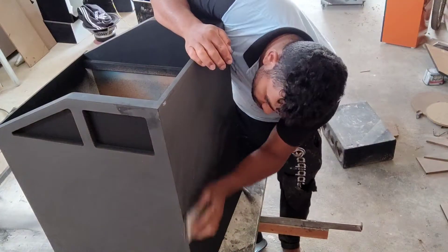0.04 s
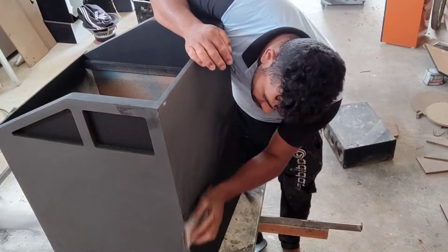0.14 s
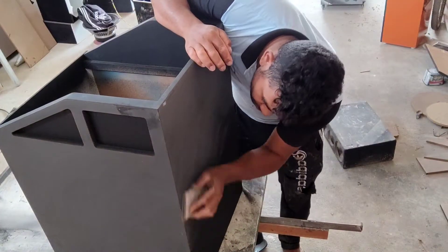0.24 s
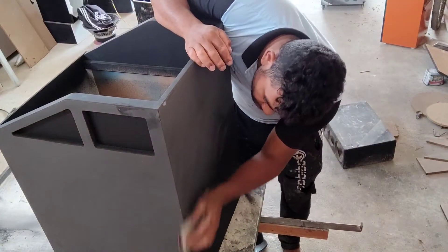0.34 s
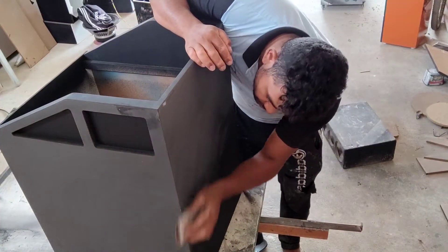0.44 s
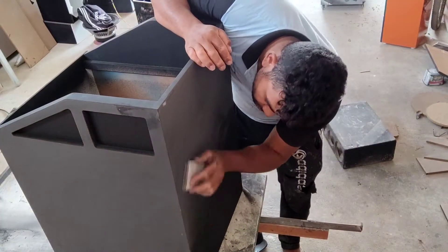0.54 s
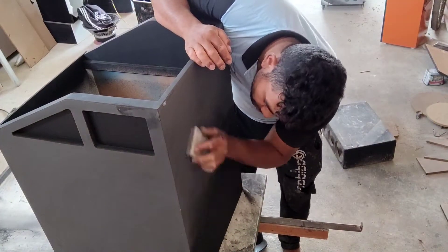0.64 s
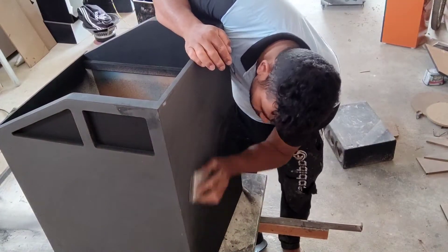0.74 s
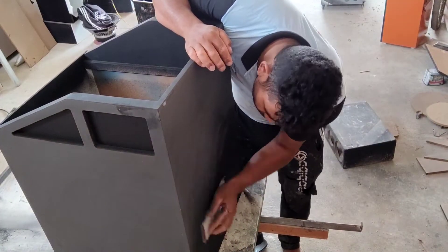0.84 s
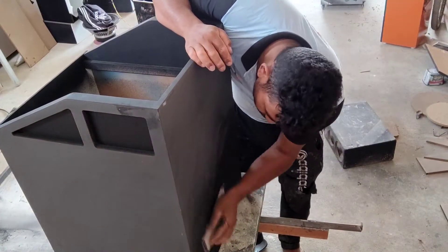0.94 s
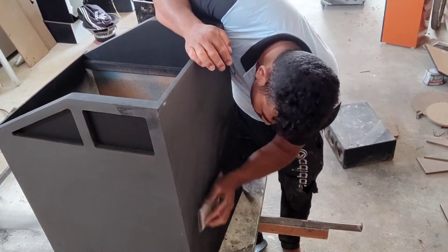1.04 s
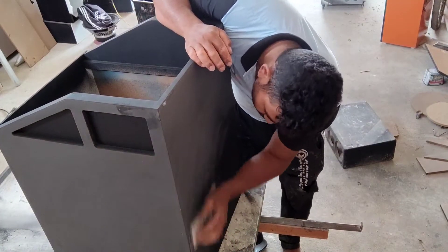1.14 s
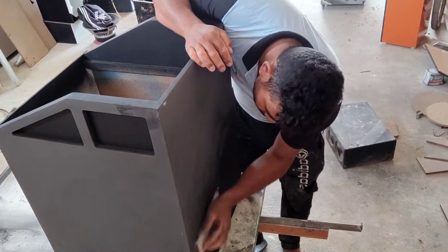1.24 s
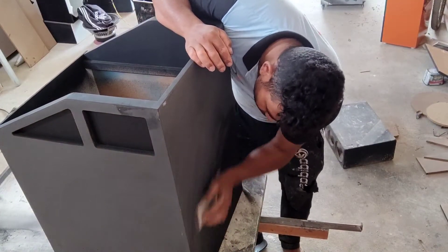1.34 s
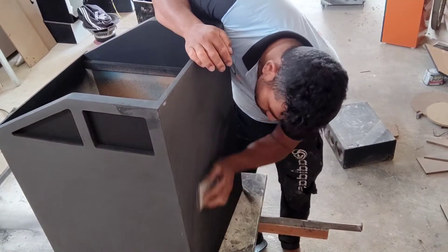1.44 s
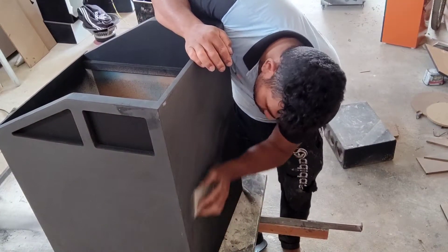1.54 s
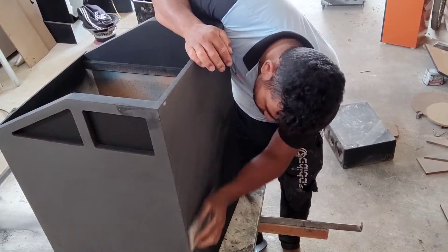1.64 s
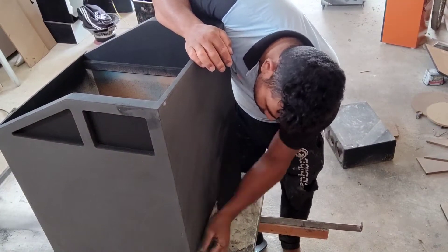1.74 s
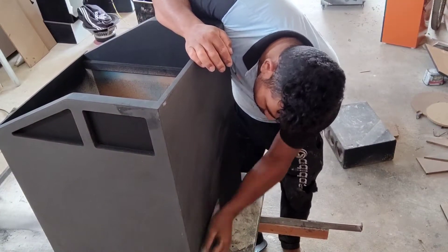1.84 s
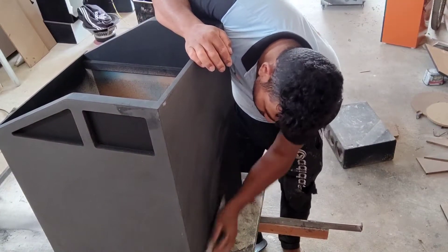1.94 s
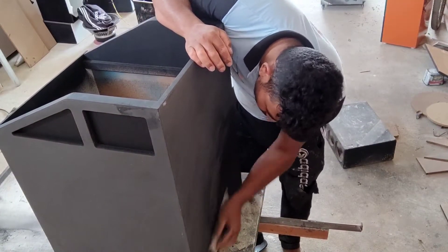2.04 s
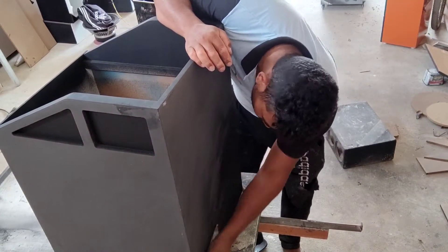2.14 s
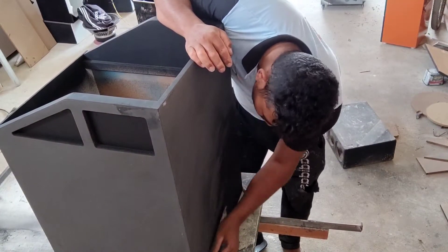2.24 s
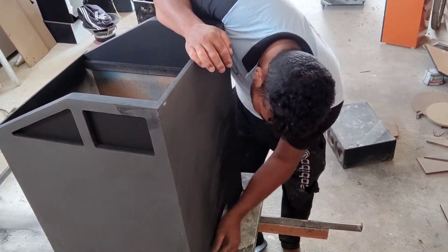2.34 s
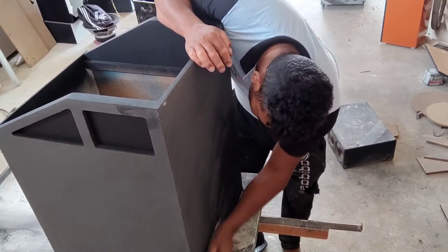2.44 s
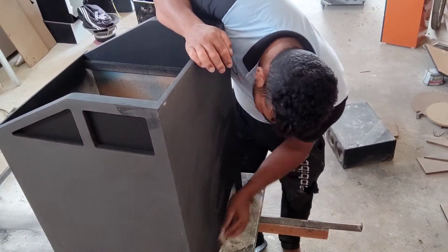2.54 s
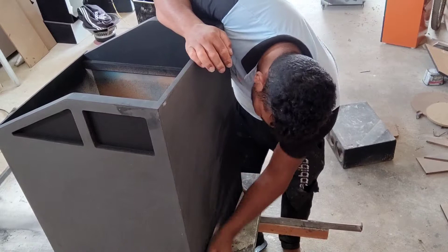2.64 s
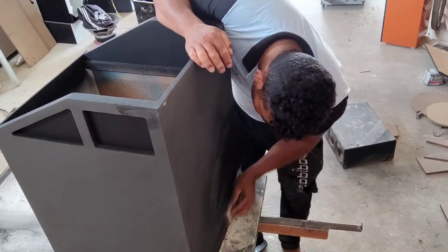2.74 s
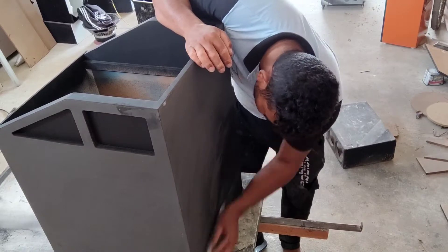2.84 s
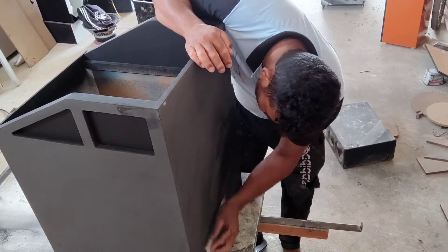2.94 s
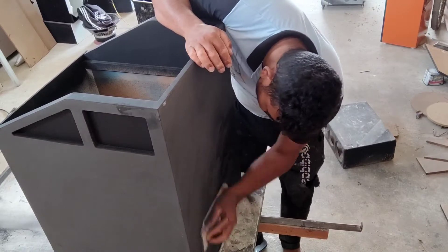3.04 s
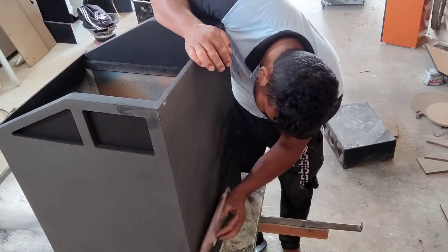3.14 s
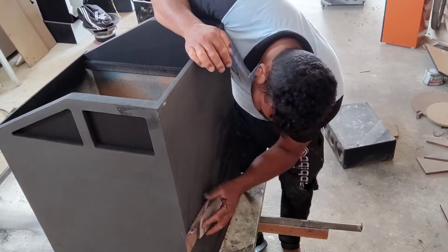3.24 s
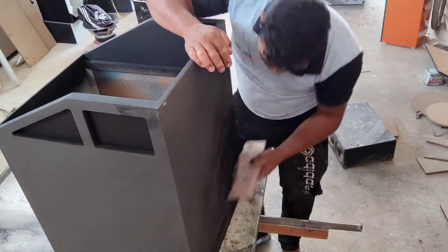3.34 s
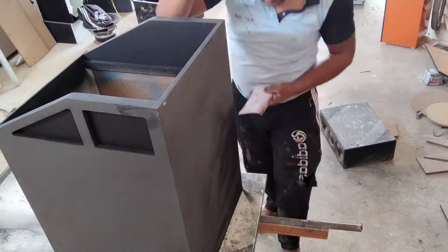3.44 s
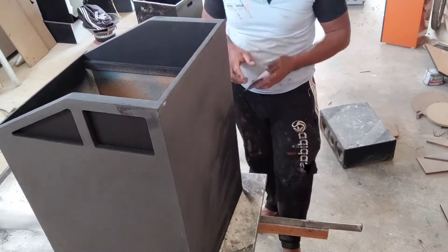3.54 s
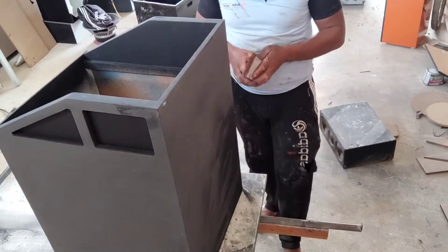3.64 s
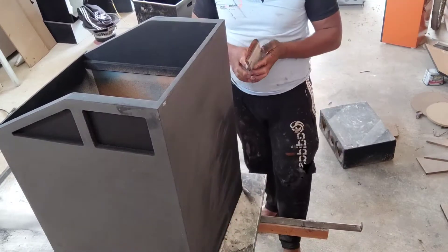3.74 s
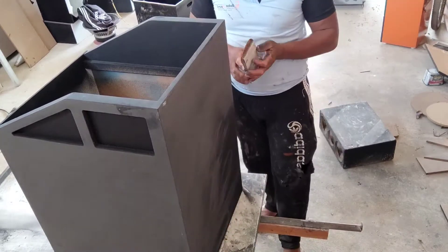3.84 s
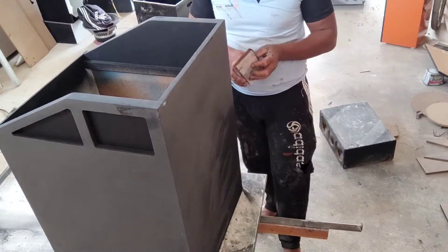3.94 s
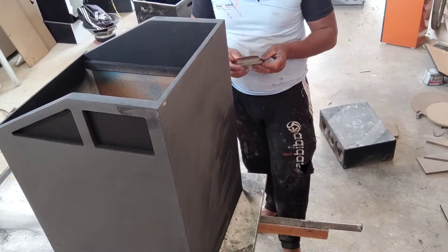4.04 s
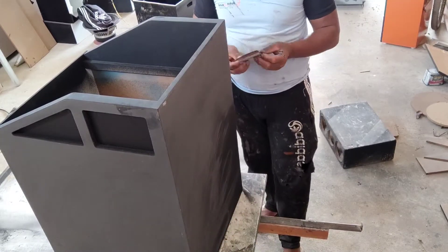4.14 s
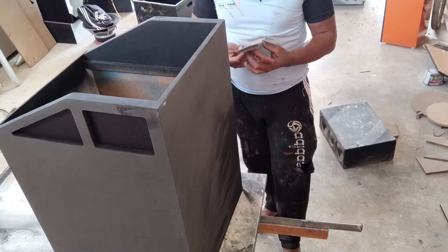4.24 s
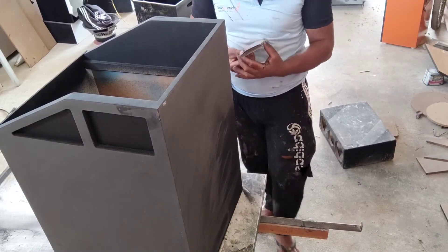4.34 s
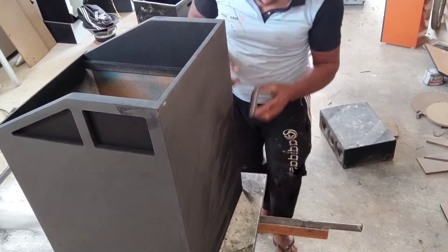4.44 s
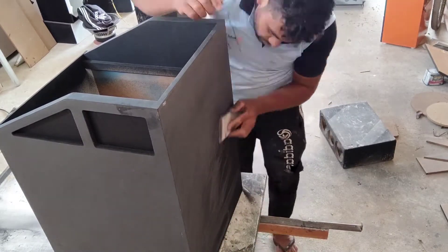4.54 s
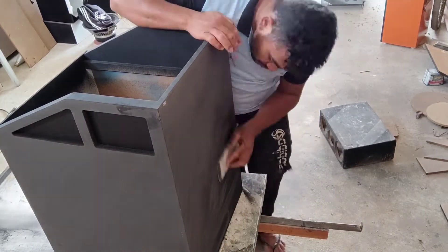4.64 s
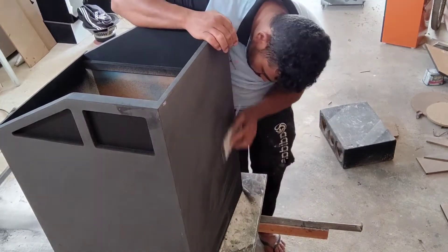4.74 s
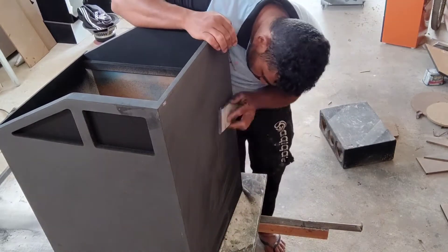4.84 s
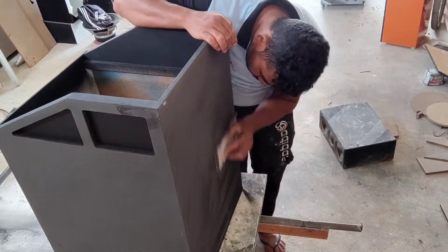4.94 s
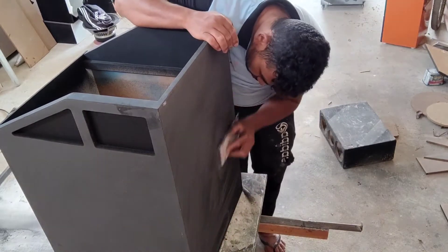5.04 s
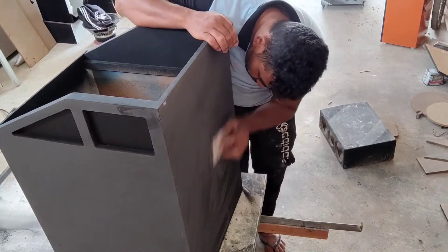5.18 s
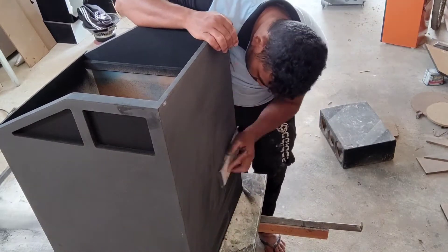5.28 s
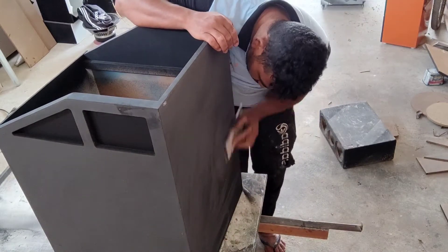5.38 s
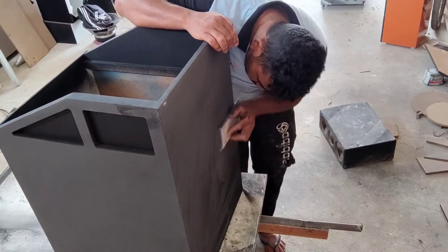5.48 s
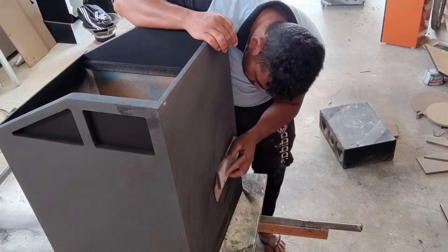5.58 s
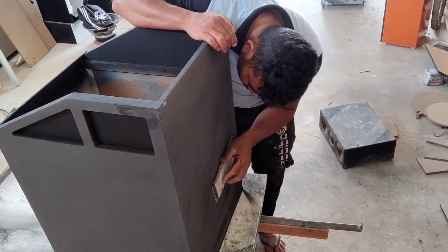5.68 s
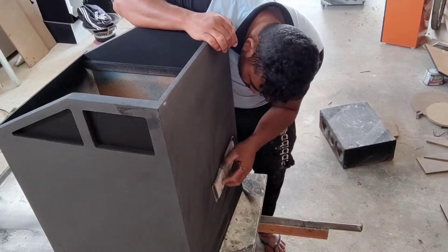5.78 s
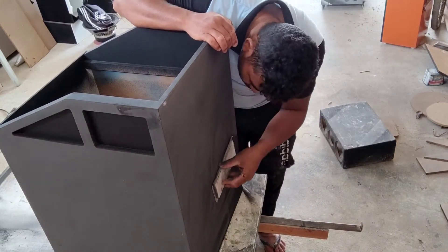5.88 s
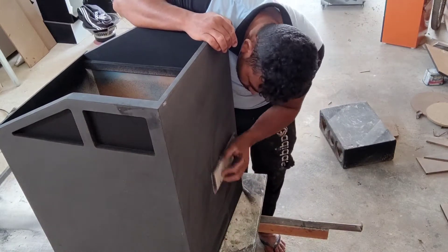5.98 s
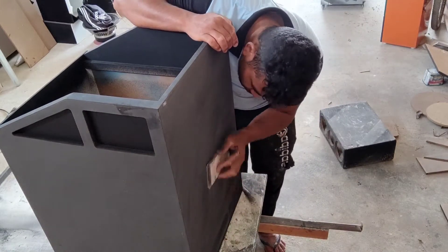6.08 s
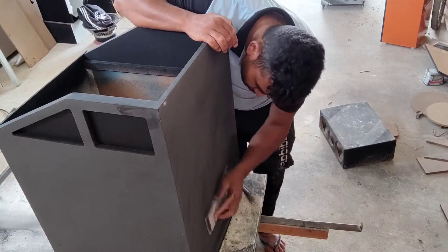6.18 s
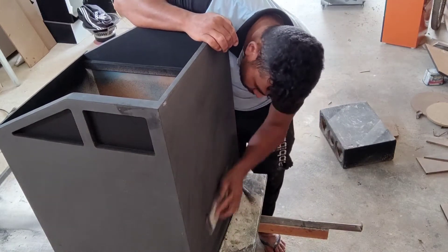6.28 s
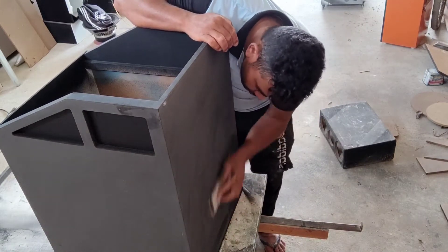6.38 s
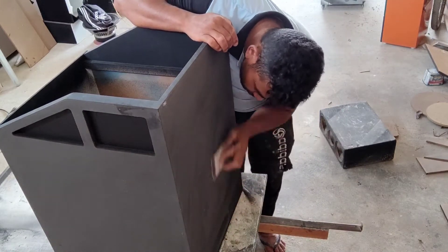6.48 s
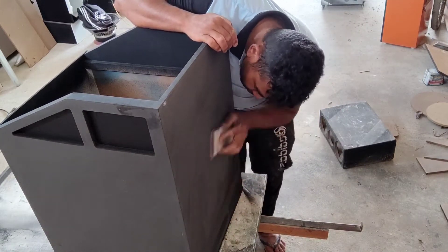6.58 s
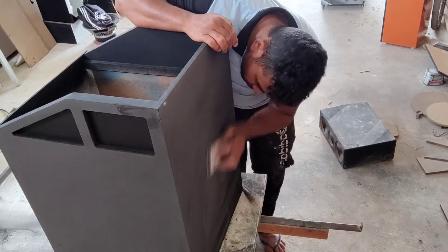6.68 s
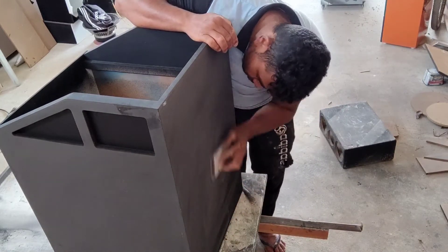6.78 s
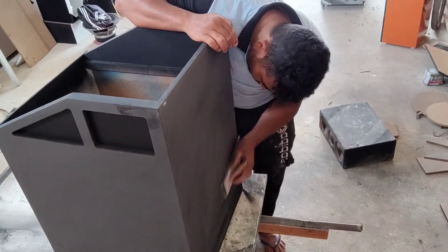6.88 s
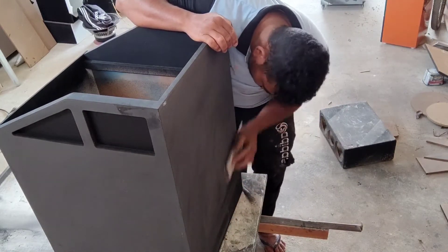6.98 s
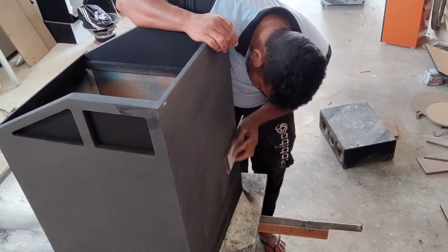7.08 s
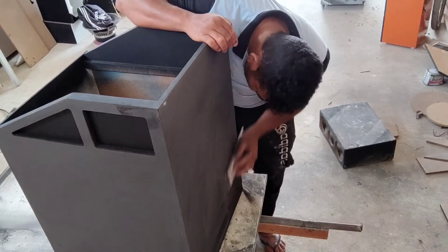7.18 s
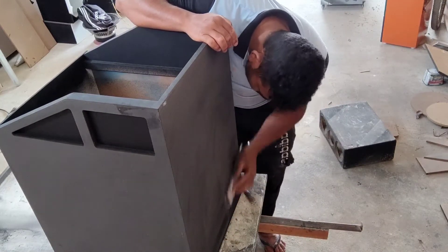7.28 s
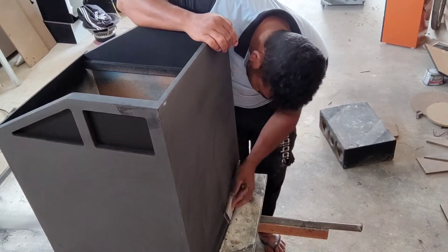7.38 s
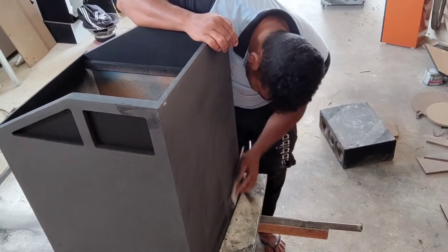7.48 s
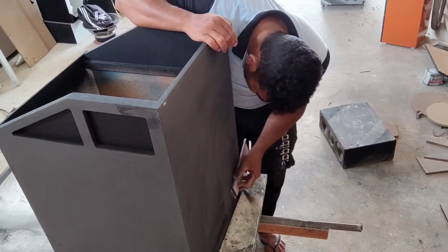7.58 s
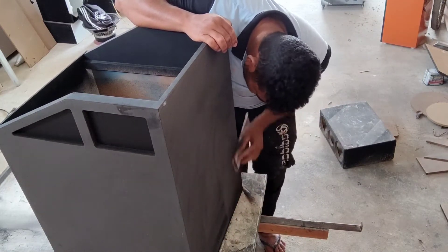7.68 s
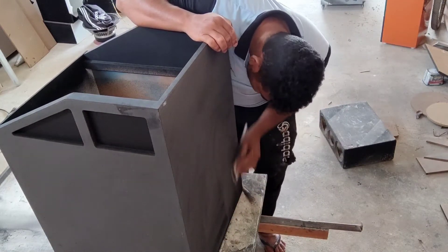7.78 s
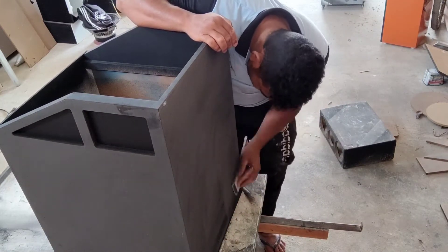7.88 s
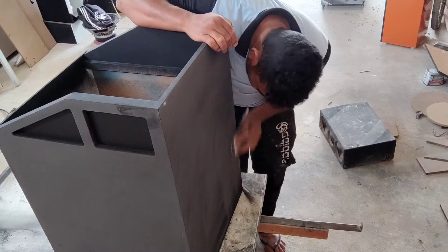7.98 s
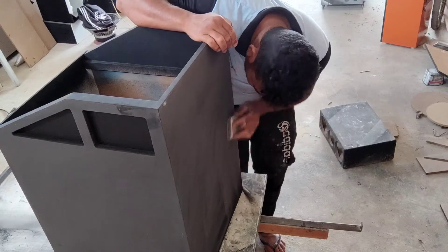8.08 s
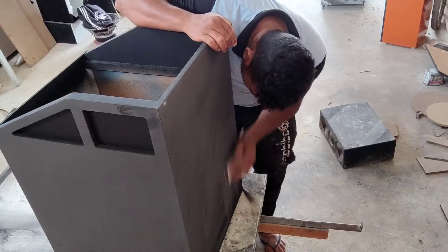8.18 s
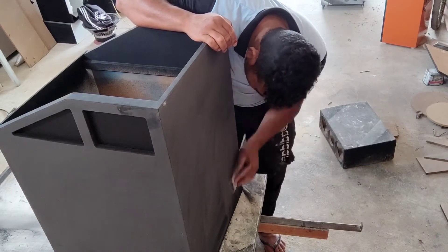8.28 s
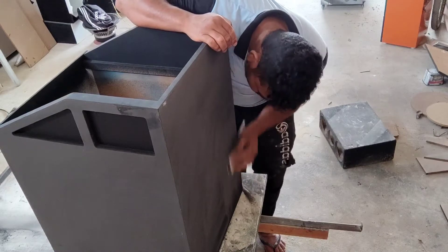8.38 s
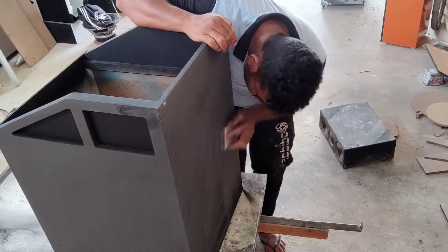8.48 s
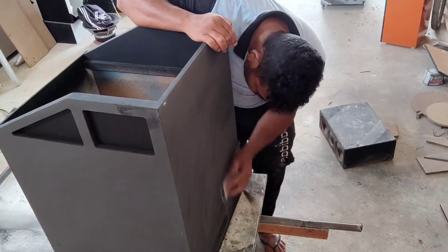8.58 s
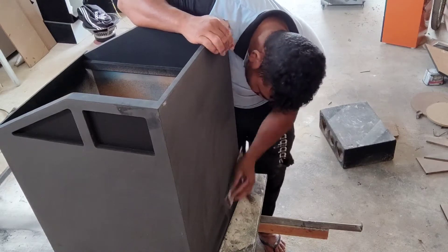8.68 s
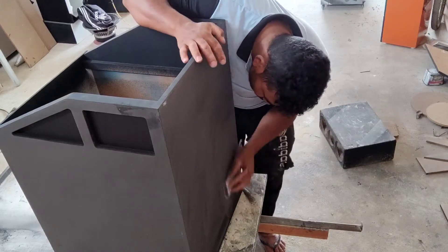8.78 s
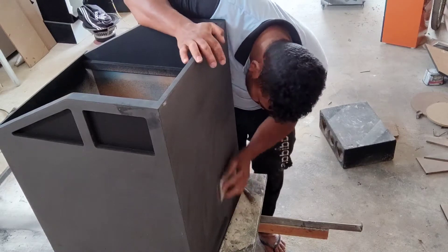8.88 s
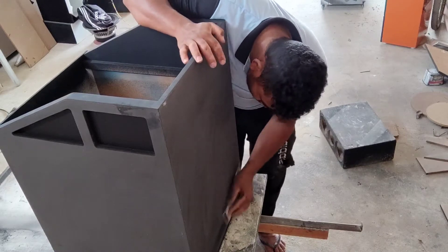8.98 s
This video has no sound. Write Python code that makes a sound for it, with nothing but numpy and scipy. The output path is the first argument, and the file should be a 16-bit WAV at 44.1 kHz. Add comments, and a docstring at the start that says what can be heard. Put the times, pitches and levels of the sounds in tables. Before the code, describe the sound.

Very fast hand sanding on a coated wooden box, a bright dry hiss with a coarser rasp, pulsing about two dozen times a second. After three seconds it stops; paper rustles and snaps faintly in the fingers. Scrubbing returns for a second, pauses briefly, then resumes to the end with one short break. Close phone microphone, quiet workshop, almost no echo.

```python
"""Quick, gritty scrubbing comes first: a hand rubs sandpaper over the side of a coated wooden box, in four bouts.
At about 24 passes a second, shaped noise makes the bright hiss and coarser rasp of grit ticking on the coating.
The panel drums faintly: friction noise and single blows ring its modes. In the pauses the paper is brushed
and turned in the hands, made from crackling noise, short snaps, a thin sliding hiss and tiny squeaks.
A phone close by hears it in a quiet workshop; each of its two microphone ports rings at its own high pitch."""
import sys
import numpy as np
from scipy import signal
from scipy.fft import rfft, irfft, next_fast_len
from scipy.io import wavfile
from scipy.ndimage import uniform_filter1d

SR = 44100
rng = np.random.default_rng(int(sys.argv[2]) if len(sys.argv) > 2 else 0)


def unload_audio(sound):
    """Save the sound as a 16-bit wav file, at the path given as the first command line argument."""
    columns = np.transpose(np.atleast_2d(sound))
    # keep every value between -1 and 1, then stretch to whole-number steps
    steps = np.round(np.clip(columns, -1, 1) * 32767)
    wavfile.write(sys.argv[1], SR, steps.astype(np.int16))


N = 397775
TIME = np.arange(N) / SR
HAND_TIME = TIME[::16]  # the hand moves slowly, so its motion is computed on a coarse clock
FREQ = np.fft.rfftfreq(2 * next_fast_len(N // 2 + 8192), 1 / SR) + 1e-3  # Hz, kept just above zero
TOP_HZ = 14300  # the sound is cut steeply above this


def pad_level(rest_db=-100):
    """Level of the pad and share of rasp, both in dB; scrubbing turns on a small loop, so it never quite stops."""
    # spells of scrubbing at an even pace; a slow or edge-on pad rasps lower:
    # start_s, end_s, passes (count), mid_pass_level_db, dip_at_turns_db, rasp_db,
    # skew (no unit; under 1 the speed peaks early in a pass)
    scrub_spells = [(-0.008, 0.099, 3, -18.0, 1.5, -3.5, 1.1), (0.107, 0.303, 5, -16, 5, -3, 1.35),
                    (0.305, 0.379, 2, -17.5, 7.5, -3.5, 0.74), (0.377, 0.486, 3, -17, 6.5, -4.5, 1.2),
                    (0.485, 0.563, 2, -21.0, 7, -3, 0.83), (0.565, 0.638, 2, -16.5, 7.5, -4.5, 0.7),
                    (0.64, 0.736, 2, -19, 12, -3.5, 0.91), (0.728, 0.827, 2, -18.5, 8, -3, 0.89),
                    (0.829, 1.085, 7, -16.5, 3.5, -1.5, 1.2), (1.086, 1.21, 3, -16, 12, -5, 0.67),
                    (1.211, 1.33, 3, -17.5, 10.0, -2.5, 0.89), (1.331, 1.451, 3, -15.5, 11.5, -6, 0.81),
                    (1.452, 1.549, 2, -18.5, 4.5, -3.0, 0.7), (1.546, 1.622, 2, -16.5, 4, -2.5, 1.35),
                    (1.624, 1.699, 2, -18, 5, -2, 1.0), (1.704, 1.792, 2, -18.5, 11, -2, 0.79),
                    (1.789, 1.924, 3, -17.5, 5.5, -4.5, 1.2), (1.92, 2.09, 3, -18, 1.5, -5, 0.65),
                    (2.083, 2.199, 3, -17.0, 1, -1.5, 0.7), (4.623, 4.744, 3, -15.5, 6, -4.5, 1.4),
                    (4.741, 4.898, 4, -16, 8.5, -5, 1.1), (4.896, 5.007, 3, -17.5, 2.5, -5, 0.83),
                    (5.016, 5.075, 2, -16.0, 1.5, -4, 1.15), (5.087, 5.332, 6, -17.5, 1, -4, 1.3),
                    (5.339, 5.396, 2, -15.5, 3, -2.0, 0.85), (5.405, 5.597, 5, -17, 5, -3, 1.35),
                    (6.089, 6.155, 2, -16.5, 6.5, -1.5, 1.3), (6.159, 6.225, 2, -17.5, 1.5, -2.5, 1.35),
                    (6.228, 6.316, 2, -17.5, 3, -4, 1.35), (6.318, 6.575, 6, -16.5, 4, -2.5, 1.1),
                    (6.581, 6.736, 4, -18.0, 1.5, -1.5, 1.35), (6.741, 6.954, 5, -18.0, 1, -2.5, 1.7),
                    (6.96, 7.086, 3, -16.5, 8, -2.0, 0.61), (7.088, 7.331, 6, -15.5, 10.5, -3.5, 1.1),
                    (7.332, 7.467, 3, -17.5, 6.5, -1.5, 1.4), (7.457, 7.565, 2, -17.0, 10, -4, 0.85),
                    (7.73, 7.816, 2, -17.5, 14.5, 1, 1.3), (7.811, 8.01, 5, -18.0, 6.5, -1.5, 0.78),
                    (8.015, 8.079, 2, -21, 3.5, -4.5, 1.0), (8.084, 8.161, 2, -21.5, 6, 0.5, 1.4),
                    (8.164, 8.292, 3, -18.5, 4.5, -1.5, 1.5), (8.285, 8.398, 3, -18, 4, -2, 0.7),
                    (8.401, 8.521, 3, -18.0, 1.5, -2, 1.35), (8.523, 8.722, 5, -19.0, 0.5, -2.5, 0.7),
                    (8.722, 9.03, 9, -19.5, 0, -2.0, 1.35)]
    # single strokes, from firm pushes to light brushes as the pad lands or lifts:
    # start_s, end_s, level_db, rasp_db
    single_strokes = [(2.211, 2.288, -23.5, 0.5), (2.288, 2.368, -24, 1), (2.381, 2.468, -19, -2),
                      (2.472, 2.538, -17.5, -2.5), (2.561, 2.657, -18, -3), (2.654, 2.723, -16.5, -2),
                      (2.75, 2.838, -18.5, -4), (2.827, 2.899, -16.5, -2.5), (2.905, 2.959, -15.5, -6.5),
                      (2.957, 3.026, -17, 0), (3.033, 3.077, -16.5, -5.5), (3.075, 3.127, -18.5, 2),
                      (3.126, 3.172, -37.5, 10), (3.2, 3.25, -54.5, 11.5), (3.246, 3.269, -31, 8),
                      (3.287, 3.308, -46.5, 7), (3.34, 3.36, -53, 10), (3.348, 3.393, -39, 8),
                      (3.418, 3.437, -47.5, 11), (3.465, 3.518, -47.5, 8.5), (3.52, 3.575, -69, 14),
                      (4.39, 4.421, -62.5, 16.5), (4.426, 4.447, -53, 19.5), (4.479, 4.498, -54, 10),
                      (4.511, 4.52, -47, 7), (4.537, 4.572, -62, 11), (4.567, 4.602, -35, 7.5),
                      (4.589, 4.611, -21.5, 3), (5.605, 5.633, -33.5, 6.5), (5.643, 5.702, -44.5, 5),
                      (5.708, 5.742, -47.5, 6), (6.008, 6.042, -58.5, 8), (6.04, 6.071, -30, 4),
                      (6.066, 6.082, -32, 4.5), (7.559, 7.568, -20.5, 2), (7.64, 7.713, -69, 15),
                      (7.708, 7.742, -39, 7)]
    # the grit catches and bites harder for an instant: start_s, lift_db
    snags = [(.757, 2.5), (.838, 2), (1.219, 2), (1.301, 2), (3.256, 3.5), (3.365, 4), (4.517, 2),
             (4.721, 5), (6.549, 3), (7.522, 3.5), (8.172, 4), (8.895, 3)]
    bite_s = 0.006  # scrubbing takes hold
    land_s, land_share = 0.042, 0.53  # a stroke gathers speed, sooner (within this share) if it is short
    snag_s = 0.012  # how soon a snag lets go
    tremor_db, tremor_rate = 1.26, 60  # the hand trembles: spread, and changes per second

    contacts = []
    for start, end, passes, db, dip_db, rasp_db, skew in scrub_spells:
        level_db = db - dip_db * turning(start, end, passes, skew)
        contacts.append((touch(start, end, bite_s) * undb(level_db), rasp_db))
    for start, end, db, rasp_db in single_strokes:
        attack_s = min(land_s, land_share * (end - start))
        contacts.append((touch(start, end, attack_s) * undb(db), rasp_db))

    power = sum(gain ** 2 for gain, _ in contacts) + undb(rest_db) ** 2
    # the stronger contact decides how coarse the sound is
    coarse_db = sum(gain ** 2 * rasp_db for gain, rasp_db in contacts) / power
    tremor = tremor_db * walk(tremor_rate)
    snag_lift_db = sum(db * flick(s, snag_s, attack_s=.002) for s, db in snags)
    motion_db = np.interp(TIME, HAND_TIME, 10 * np.log10(power))
    return motion_db + tremor + snag_lift_db, np.interp(TIME, HAND_TIME, coarse_db)


def touch(start, end, attack_s, release_s=0.016):
    """Gain of one contact: it takes hold, stays, then dies away."""
    rise = np.sin(np.pi / 2 * np.clip((HAND_TIME - start) / attack_s, 0, 1)) ** 2
    return rise * np.exp(-np.clip((HAND_TIME - end) / release_s, 0, 20))


def turning(start, end, passes, skew, sharpness=0.87):
    """1 at each turn of the hand, 0 at full speed; more sharpness gives shorter bursts and longer turns."""
    place = np.clip((HAND_TIME - start) / (end - start), 0, 1) * round(passes)
    speed = np.abs(np.sin(np.pi * (place % 1) ** abs(skew))) ** sharpness
    return 1 - speed


def sanding(pad_db, coarse_db, hiss_db=-9.0, rasp_db=-7.0, split_hz=6000, rasp_follow=0.47,
            edge_db=-22, scratch_db=1.18, scratch_rate=170):
    """Grit snaps over the coating: a bright hiss follows the speed, a coarser rasp sounds through the panel."""
    # tone of the grit, brought to a common level below: pitch_hz, relative_level_db (per Hz)
    grit_tone = [(150, -35.5), (350, -30), (600, -30), (1000, -21), (1600, -14.5), (2400, -8.5),
                 (3100, -5.5), (4200, -6.5), (5500, -3.5), (7500, -1.5), (10000, 0.5), (12000, -0.24),
                 (14200, -3.5)]
    # gain of the scrape near 5 kHz: time_s, gain_db
    scrape_gain = [(0, 1.5), (.8, 1), (1.8, 3.5), (2.8, 0.5), (5, 1.1), (6.5, -0.5), (7.5, 0), (7.9, -4),
                   (9, -1.5)]
    # coarse grit digs in for one pass and scratches lower: middle_s, rasp_lift_db
    digs = [(0.902, 2), (1.082, 1), (1.153, 4), (1.313, 2), (1.395, 6.5), (1.826, 5), (1.92, 4),
            (2.023, 6.5), (4.815, 4.5), (5.276, 4.5), (5.444, 2.5), (6.96, 0.5), (7.122, 6), (7.216, 3.5),
            (7.287, 4), (7.373, 0), (7.465, 3), (7.782, 2), (7.888, 0.5), (8.044, 5.5), (8.12, 3),
            (8.83, 4)]
    # the sheet arches off the panel and sounds hollow near 3 kHz: middle_s, bell_spread_s, added_gain_db
    arches = [(.87, 0.015, -9), (1.38, .09, -12.5), (2.31, 0.037, -5), (2.51, 0.033, -4)]
    dig_spread_s = 0.014

    gain_db, = curves(scrape_gain)
    grit = colour(grit_tone)
    grit = grit / np.sqrt(np.mean(grit ** 2 * (FREQ < TOP_HZ)))
    low_share = 1 / (1 + (FREQ / split_hz) ** 6)  # the rasp fills the lows, the hiss the highs

    fine = grains(rate=1700, spread_db=8, ring_s=.0006, bed=2.2)
    coarse = grains(rate=800, spread_db=8, ring_s=.0008, bed=1.6)
    hiss = fine * undb(pad_db + hiss_db)

    # the coarse grit scratches unevenly and now and then digs in
    digs_db = sum(db * bell(HAND_TIME, s, dig_spread_s) for s, db in digs)
    bite_db = np.interp(TIME, HAND_TIME, digs_db) + scratch_db * walk(scratch_rate)
    # under pressure the rasp follows the quick level changes less, so it holds up a little at the turns
    hold_db = (rasp_follow - 1) * (pad_db - uniform_filter1d(pad_db, size=2400))
    press = pressed(pad_db)
    rasp_level_db = pad_db + rasp_db + coarse_db + bite_db + press * hold_db
    rasp = panel(coarse * undb(rasp_level_db), press)

    # held edge-on, the loose sheet adds a hollow note of its own
    edge = through(rasp * undb(edge_db + coarse_db), resonance(1550, 1700) ** 2)
    high_part = through(hiss, grit * np.sqrt(1 - low_share))
    low_part = through(rasp, grit * np.sqrt(low_share))
    scrape = high_part + low_part
    hollow = swells(arches) * through(scrape, resonance(3200, 800))
    treble_change = (undb(gain_db) - 1) * through(scrape, resonance(5400, 2500))
    return scrape + treble_change + edge + hollow


def pressed(pad_db, half_db=-36, range_db=6):
    """How firmly the pad lies on the panel: near 0 for a light brush, near 1 for full scrubbing."""
    return 1 / (1 + np.exp((half_db - pad_db) / range_db))


def panel(x, press, count=10):
    """Under pressure dense upper modes colour the rasp; which of them answer changes as the pad wanders."""
    ring_db, t60_s, wander_rate = -2, .05, 11  # strength, time to fade by 60 dB, changes per second
    weights = np.array([walk(wander_rate) for _ in range(count)])
    weights = weights / np.sqrt(np.sum(weights ** 2, axis=0))
    ring = sum(through(x * press * weight, ringing(t60_s)) for weight in weights)
    steady_level = np.sqrt(1 + (press * undb(ring_db)) ** 2)  # keeps the ringing from adding loudness
    return (x + undb(ring_db) * ring) / steady_level


def box(pad_db, rub_db=-52, rub_follow=0.59, drag_low_hz=250):
    """Friction, the soft bumps of the hands and the knocks of the pad all ring the same panel modes."""
    # modes of the box: pitch_hz, width_hz, relative_level_db
    box_modes = [(142, 19, 2.5), (184.3, 55, 1.5), (392, 160, -1), (550, 70, -2), (707, 120, -1),
                 (873, 16, -10.5), (937, 250, -7.5), (1390, 98, -2)]
    # the pad drags hard enough to shake the panel: middle_s, bell_spread_s, level_db
    drags = [(.25, 0.091, -56), (.92, 0.031, -64), (1.03, 0.037, -59), (2.15, 0.018, -55),
             (2.445, 0.028, -54), (2.63, 0.021, -47.5), (3.0, .03, -64), (3.264, 0.011, -50),
             (3.32, 0.034, -60), (3.372, .008, -63), (3.51, 0.026, -60), (5.61, 0.021, -51.5),
             (6.06, 0.013, -54.5), (6.98, .015, -57), (7.81, 0.024, -58)]
    # hands bump the box: time_s, peak_db (before gain_db)
    bumps = [(1.555, -53), (3.318, -60), (3.339, -55), (3.423, -60), (3.49, -53), (3.512, -51),
             (3.524, -46.5), (3.624, -59), (3.674, -60), (4.569, -56), (4.579, -45), (5.619, -55),
             (5.86, -59), (6.246, -53), (7.931, -54), (8.761, -55)]
    # the edge of the pad knocks on the box: time_s, peak_db (before gain_db)
    knocks = [(2.624, -42), (3.259, -46), (3.371, -55), (3.429, -57), (4.518, -58), (5.607, -55)]

    modes = sum(undb(db) * resonance(hz, width) for hz, width, db in box_modes)
    # dragging and knocking stir the deepest modes less
    dragged = modes * (FREQ / drag_low_hz) ** 2 / (1 + (FREQ / drag_low_hz) ** 2)
    rub_force = undb(rub_db + rub_follow * pad_db)
    friction = 0
    for force, body in [(rub_force, modes), (swells(drags), dragged)]:
        even_body = body / np.sqrt(np.mean(np.abs(body) ** 2))
        friction = friction + through(force * noise(0.39), even_body)
    bumping = strike(bumps, modes, soft_hz=240, gain_db=2)
    knocking = strike(knocks, dragged, soft_hz=1800, gain_db=7)
    return friction + bumping + knocking


def strike(table, modes, soft_hz, gain_db):
    """Blows (time_s, peak_db) ring the modes; a softer contact reaches mainly the lower ones."""
    response = modes / (1 + 1j * FREQ / soft_hz) ** 3
    blows = np.zeros(N)
    for s, db in table:
        blows[int(s * SR)] = undb(db + gain_db)
    return through(blows, response / np.abs(irfft(response)).max())


def paper(rustle_db=-3, slide_db=-6, tick_s=0.0033):
    """The sheet crackles at each flick of the fingers, its creases snap, and it slides briefly over itself."""
    # the paper is flicked and turned in the fingers: start_s, decay_s, centre_hz, level_db (before rustle_db)
    rustles = [(3.582, 0.038, 3300, -50), (3.621, .03, 3300, -58), (3.655, 0.043, 3300, -55.5),
               (3.72, .03, 3000, -64), (3.797, 0.036, 3800, -55.5), (3.852, .04, 3770, -56),
               (3.918, 0.02, 3800, -54), (3.96, .05, 3300, -69.5), (4.012, 0.034, 4500, -59.5),
               (4.086, 0.023, 8000, -48), (4.157, 0.022, 6000, -57), (5.829, .01, 7000, -64),
               (5.878, .016, 9000, -57), (5.946, .014, 7000, -61)]
    # creases of the sheet snap: start_s, level_db (before the tone filter)
    crease_ticks = [(3.314, -49), (3.624, -59), (4.271, -66), (4.295, -60), (4.399, -64), (4.436, -51),
                    (4.491, -54)]
    # paper slides on paper with a thin hiss: time_s, centre_hz, level_db (before slide_db)
    slide_path = [(4.01, 7800, -100), (4.045, 8100, -68), (4.07, 7850, -53), (4.095, 8100, -60),
                  (4.128, 8200, -54), (4.16, 8600, -65), (4.195, 9200, -59.5), (4.26, 9170, -110)]

    crackle = grains(rate=900, spread_db=7, ring_s=.0008, bed=1)
    rustle = 0
    for s, decay_s, hz, db in rustles:
        band = signal.butter(1, [hz / 2, min(hz * 2, .45 * SR)], "bandpass", fs=SR)
        burst = crackle * flick(s, decay_s, attack_s=0.0079)
        rustle = rustle + signal.lfilter(*band, burst) * undb(db + rustle_db)
    soft_rustle = through(rustle, 1 / (1 + (FREQ / 13500) ** 4))

    snaps = sum(undb(db) * flick(s, tick_s, attack_s=.0005) for s, db in crease_ticks)
    ticks = through(snaps * noise(0), resonance(5600, 9000))

    # slow noise times a tone gives a narrow hiss around that tone
    hz, db = curves(slide_path)
    flutter = unit(through(noise(0), resonance(140, 620) ** 2))
    slide = flutter * np.sin(2 * np.pi * np.cumsum(hz) / SR) * undb(db + slide_db)
    return soft_rustle + ticks + slide


def squeaks():
    """Skin and paper stick and slip for a moment at an unsteady pitch."""
    # short faint squeaks as the hands let go and shift: middle_s, bell_spread_s, pitch_hz,
    # glide (octaves per s), waver (share of pitch), level_db
    squeak_list = [(3.323, .014, 870, 0.078, .02, -61), (3.3, .02, 330, 0.94, .07, -65),
                   (3.354, .018, 392, 0.37, .06, -69), (3.768, .017, 4200, .1, .005, -75)]
    out = 0
    for s, spread_s, hz, glide, waver, db in squeak_list:
        octaves = glide * np.clip(TIME - s, -2 * spread_s, 2 * spread_s)
        pitch = hz * 2 ** octaves * (1 + waver * walk(200))
        tone = np.sqrt(2) * np.sin(2 * np.pi * np.cumsum(pitch) / SR)
        out = out + swells([(s, spread_s, db)]) * tone
    return out


def room(x, wet_db=-24, t60_s=0.079):
    """Floor and clutter return a short, slightly dull tail."""
    tails = np.array([ringing(t60_s), ringing(t60_s)]) / (1 + 1j * FREQ / 7000)
    return x + undb(wet_db) * through(x, tails)


def workshop(air_db=-67):
    """Still air, more alike at both ears in the bass, and a faint wash of noise that sinks unevenly."""
    # air of the workshop: pitch_hz, relative_level_db (per Hz)
    air_tone = [(25, 1.5), (60, -1), (95, -7), (135, 0), (200, -3), (300, -4.5), (550, -11.5), (1000, -32),
                (2000, -18.5), (5000, -19.5), (9000, -29), (14000, -32.5)]
    # a faint wash near 800 Hz, steady at first, sinks unevenly from 3.1 s and stays low: time_s, level_db
    wash_level = [(3.1, -62), (3.3, -69), (3.8, -65.5), (4.15, -73), (4.6, -72)]
    bass = 1 / (1 + (FREQ / 400) ** 2)
    shared_air = through(noise(0.44), colour(air_tone) * np.sqrt(bass))
    separate_air = through(noise(0), colour(air_tone) * np.sqrt(1 - bass))
    air = unit(shared_air + separate_air) * undb(air_db + 1.2 * walk(2.6))
    level_db, = curves(wash_level)
    wash = unit(through(noise(0.068), resonance(730, 1000) ** 2)) * undb(level_db)
    return air + wash


def grains(rate, spread_db, ring_s, bed):
    """Many tiny snaps of uneven size over a steady bed; both ears share the snap times but not the noise."""
    snaps = (rng.random(N) < rate / SR) * undb(spread_db * rng.random(N))
    energy = signal.lfilter([1], [1, -np.exp(-2 / (ring_s * SR))], snaps ** 2)
    loudness = np.sqrt(energy / energy.mean() + abs(bed))
    return unit(loudness * np.tanh(noise(0)))  # tanh rounds off the tallest peaks


def ringing(t60_s):
    """Response of countless modes that die away together, as a fading noise tail of energy 1."""
    t = TIME[:16000]
    tail = rng.standard_normal(len(t)) * np.exp(-np.log(1000) * t / t60_s) * (t > .002)
    return rfft(tail / np.sqrt(np.sum(tail ** 2)), 2 * (len(FREQ) - 1))


def flick(start, decay_s, attack_s):
    """Gain that jumps up and dies away."""
    age = HAND_TIME - start
    fade = np.exp(-np.clip((age - attack_s) / decay_s, 0, 20))
    return np.interp(TIME, HAND_TIME, np.clip(age / attack_s, 0, 1) * fade)


def bell(clock, middle_s, spread_s):
    """Smooth bell-shaped rise and fall, 1 in the middle."""
    return np.exp(-np.minimum(((clock - middle_s) / spread_s) ** 2, 100) / 2)


def swells(table):
    """Gain of bell-shaped swells (middle_s, bell_spread_s, level_db)."""
    return sum(undb(db) * bell(TIME, s, spread_s) for s, spread_s, db in table)


def walk(rate):
    """Smooth chance with a spread near 1, heading for a new random value rate times a second."""
    knots = rng.standard_normal(4096)
    return 1.2 * np.interp(TIME * rate, np.arange(len(knots)), knots)


def noise(likeness):
    """White noise at two ears that share a part of its power."""
    share = np.clip(likeness, 0, 1)
    return np.sqrt(share) * rng.standard_normal(N) + np.sqrt(1 - share) * rng.standard_normal((2, N))


def resonance(hz, width_hz):
    """Response of one damped mode, gain 1 at its centre."""
    return 1 / (1 + 1j * (FREQ / hz - hz / FREQ) * hz / width_hz)


def colour(points):
    """Response through (pitch_hz, level_db) points."""
    hz, db = np.transpose(points)
    return undb(np.interp(np.log(FREQ), np.log(hz), db))


def through(x, response):
    """Filter by a frequency response."""
    return irfft(rfft(x, 2 * (len(FREQ) - 1)) * response)[..., :N]


def curves(table):
    """The columns of a table, joined by straight lines in time."""
    s, *columns = np.transpose(table)
    return [np.interp(TIME, s, c) for c in columns]


def unit(x):
    """Scale to an average (rms) level of 1."""
    return x / np.sqrt(np.mean(x ** 2))


def undb(db):
    """Decibels to gain."""
    return 10 ** (np.asarray(db) / 20)


def scene():
    """Pad, box and paper in the workshop."""
    pad_db, coarse_db = pad_level()
    close_sounds = sanding(pad_db, coarse_db) + box(pad_db) + paper() + squeaks()
    return room(close_sounds) + workshop()


def record(dry):
    """Each port lifts its own band of treble; the top is cut steeply."""
    # resonance of the left and right microphone port: pitch_hz, width_hz, added_gain_db
    port_modes = [(11160, 1580, 12), (8893, 825, 14.5)]
    ports = np.array([1 + undb(db) * resonance(hz, width) for hz, width, db in port_modes])
    top = signal.ellip(12, .1, 80, TOP_HZ, fs=SR, output="sos")
    return signal.sosfilt(top, through(dry, ports))


dry = scene()
out = record(dry)
unload_audio(out)
```